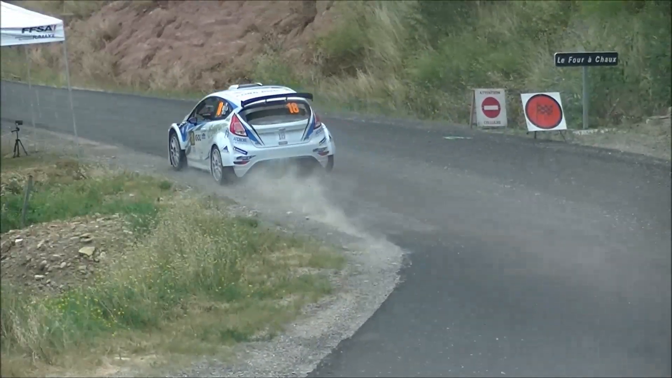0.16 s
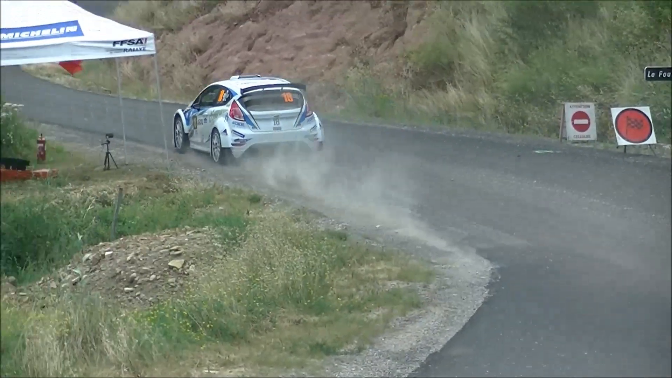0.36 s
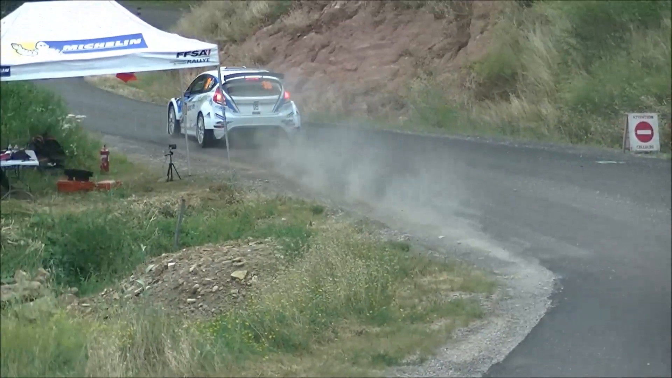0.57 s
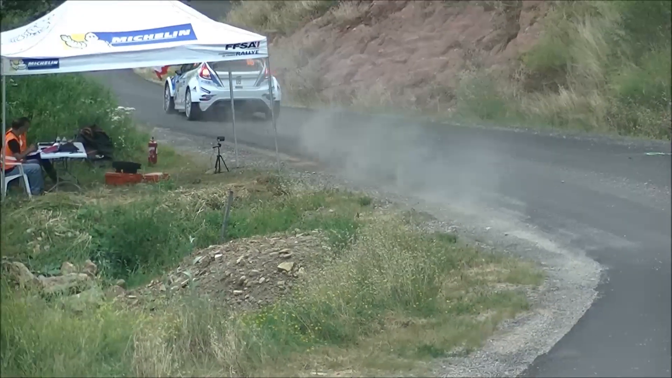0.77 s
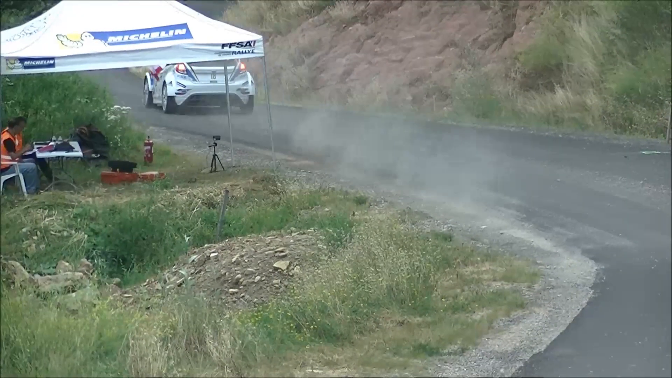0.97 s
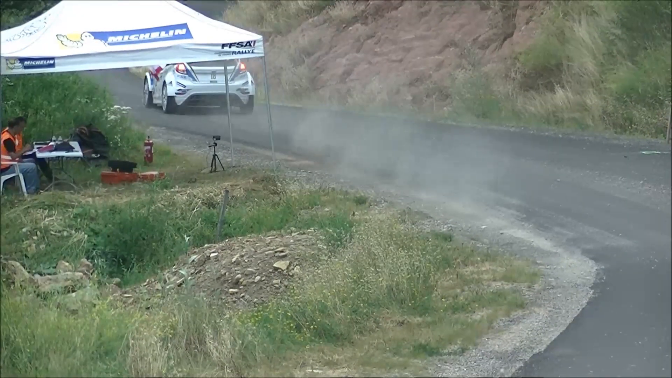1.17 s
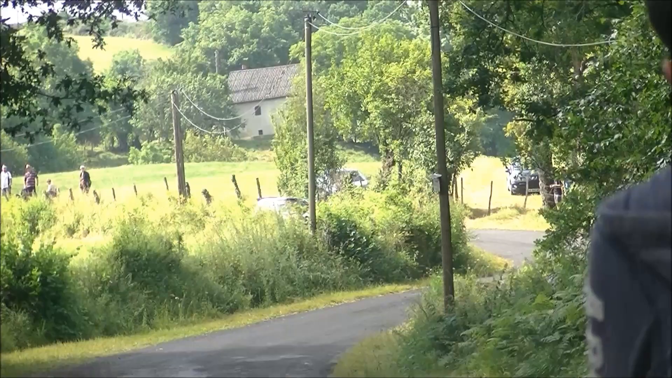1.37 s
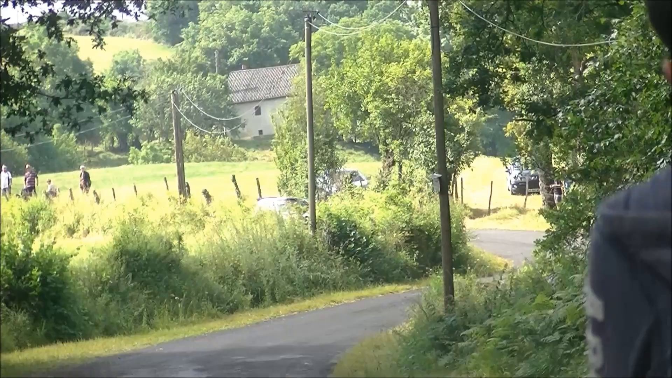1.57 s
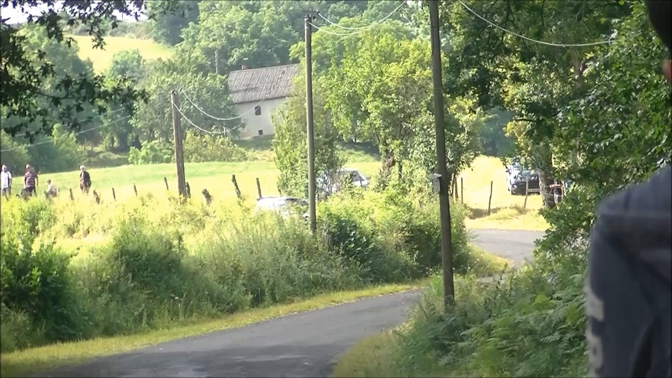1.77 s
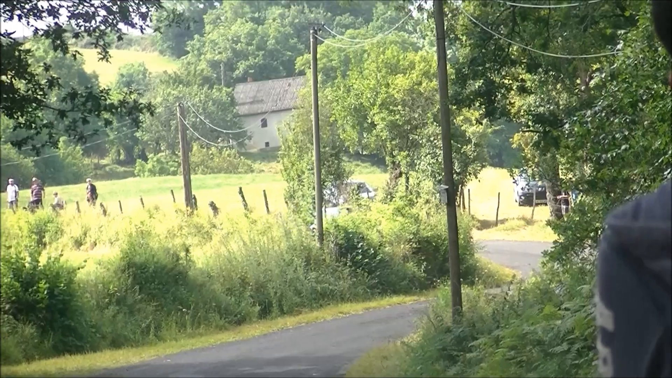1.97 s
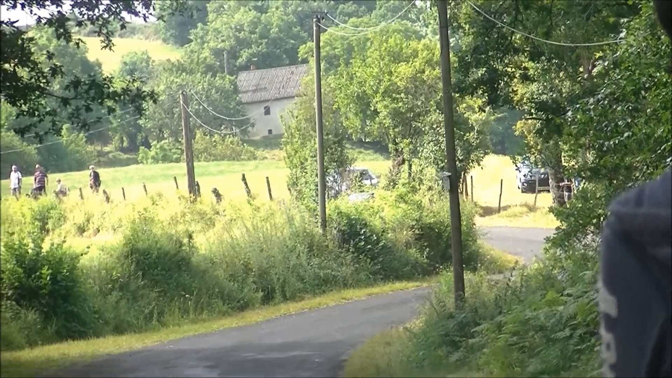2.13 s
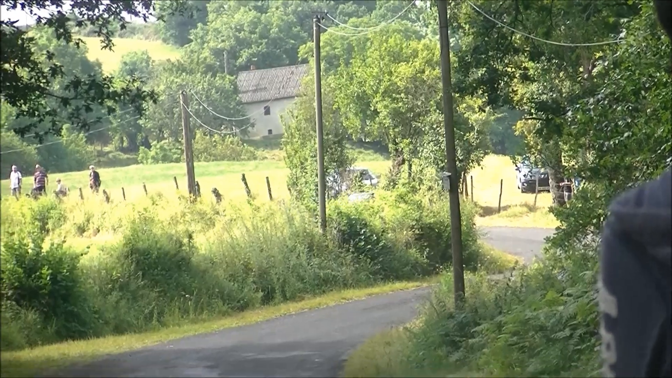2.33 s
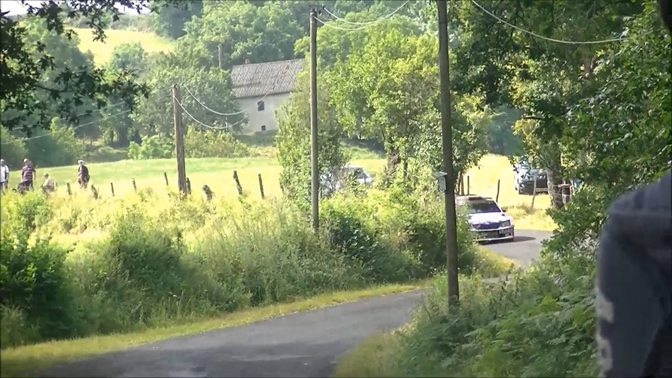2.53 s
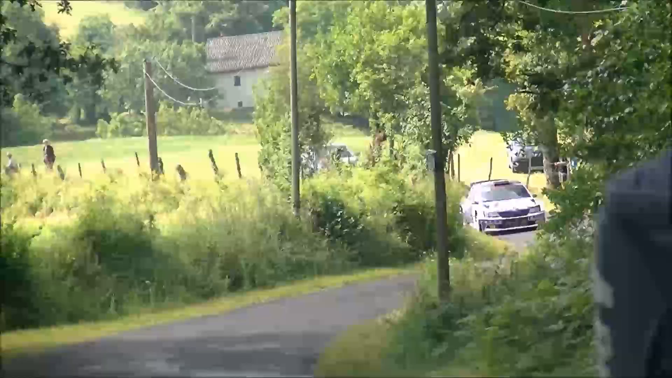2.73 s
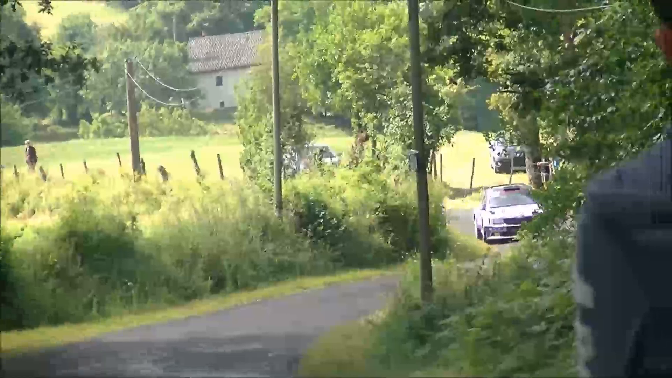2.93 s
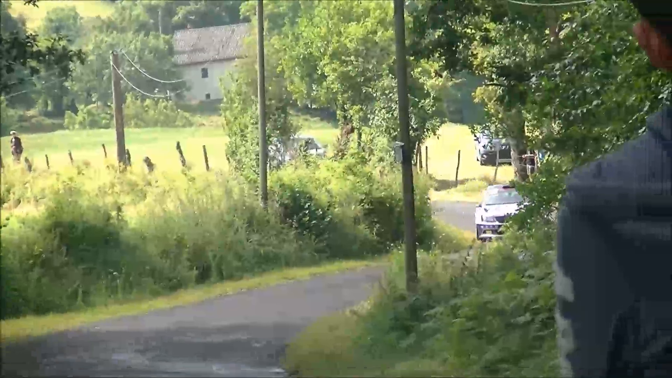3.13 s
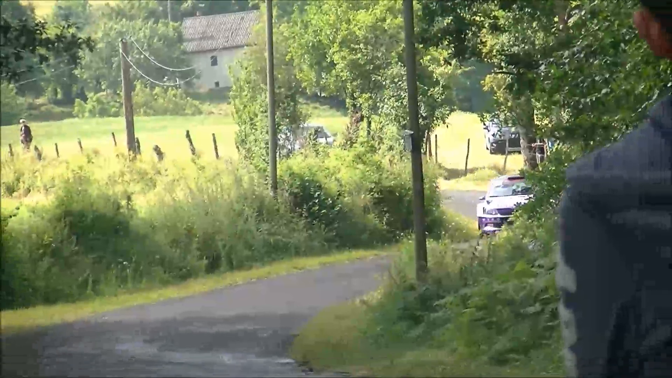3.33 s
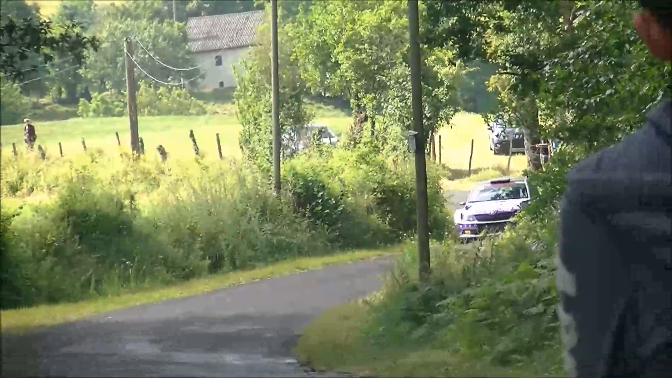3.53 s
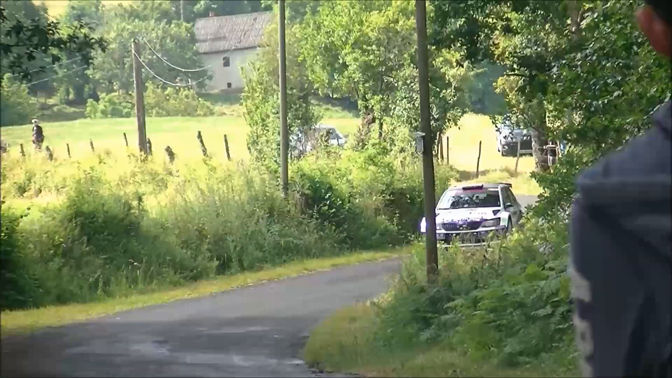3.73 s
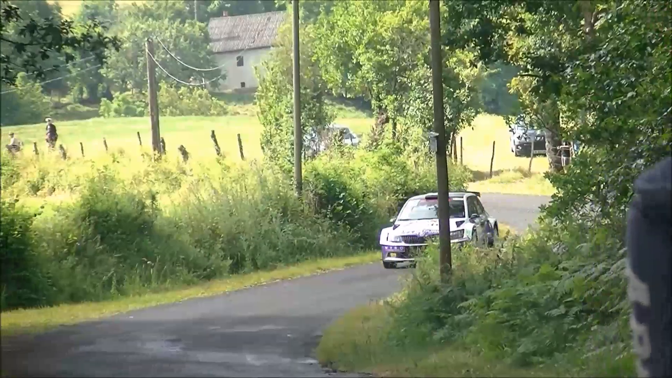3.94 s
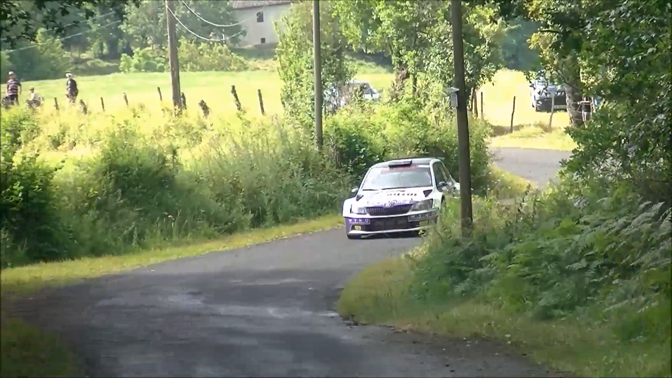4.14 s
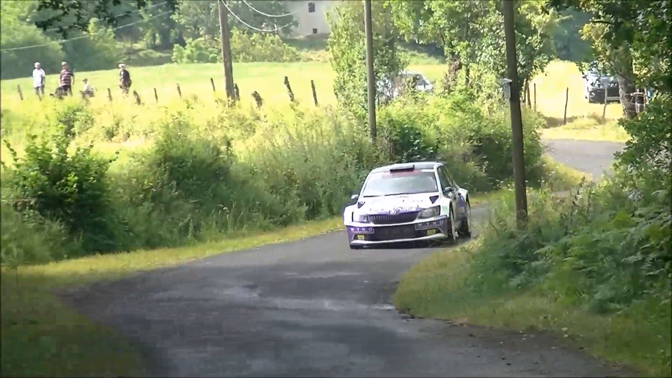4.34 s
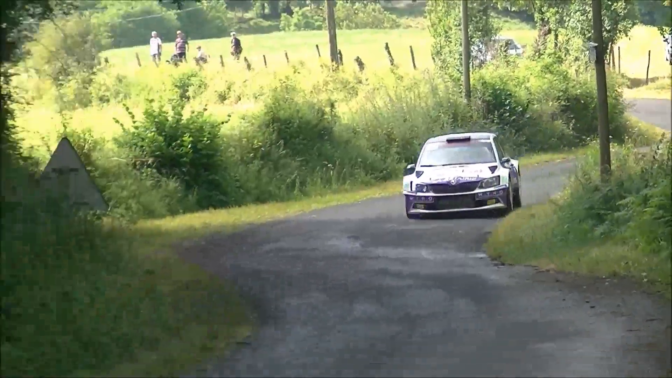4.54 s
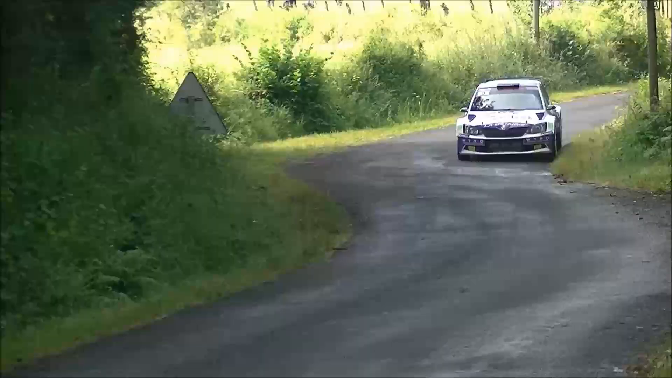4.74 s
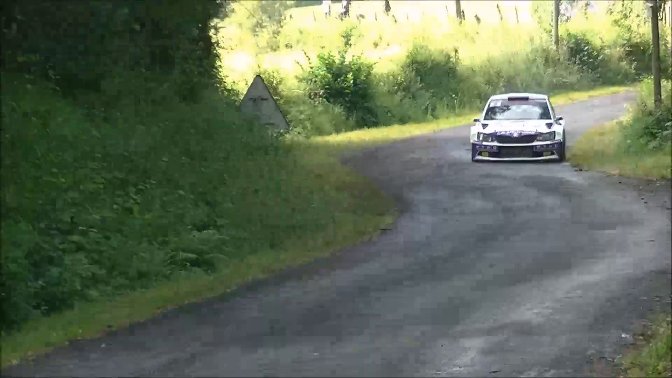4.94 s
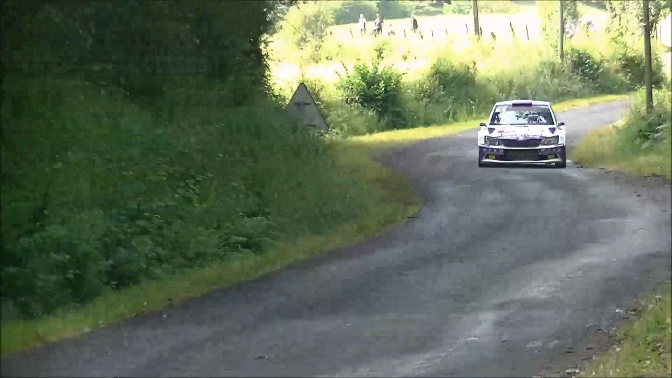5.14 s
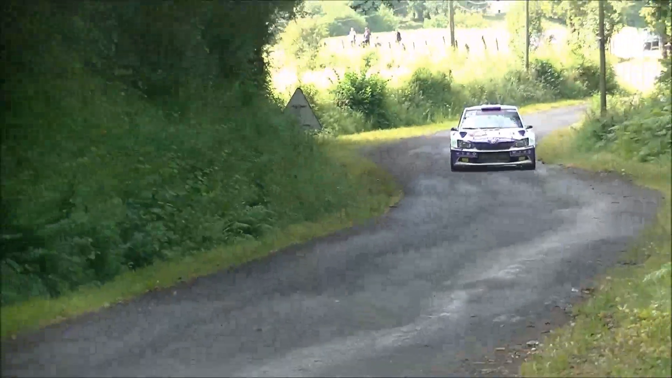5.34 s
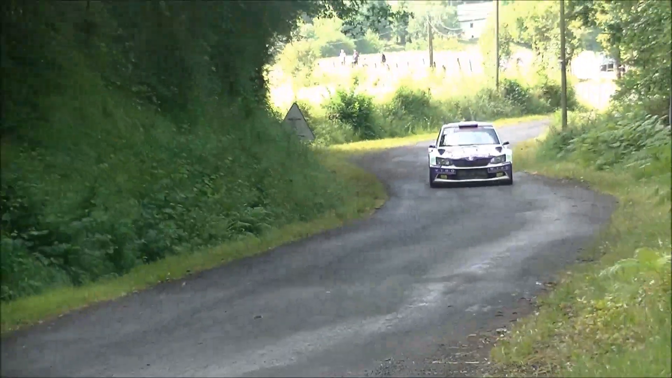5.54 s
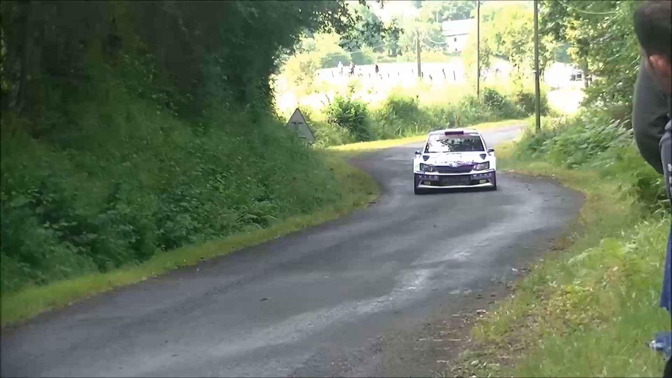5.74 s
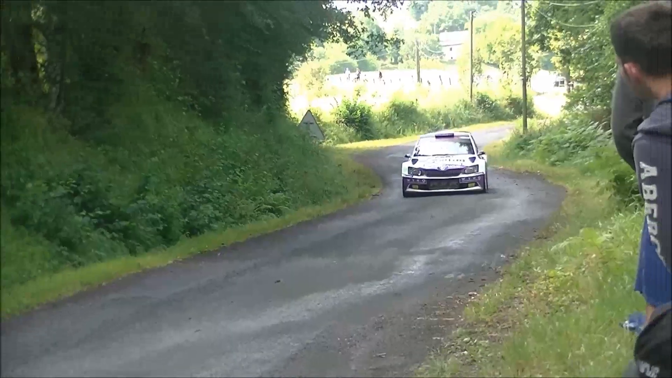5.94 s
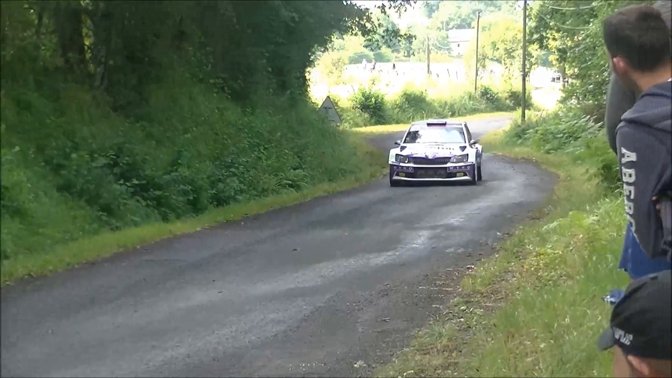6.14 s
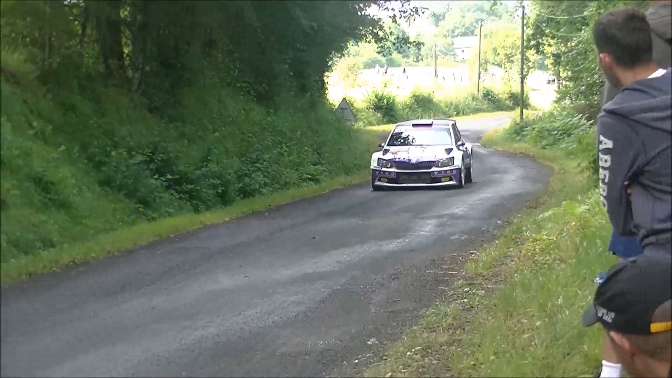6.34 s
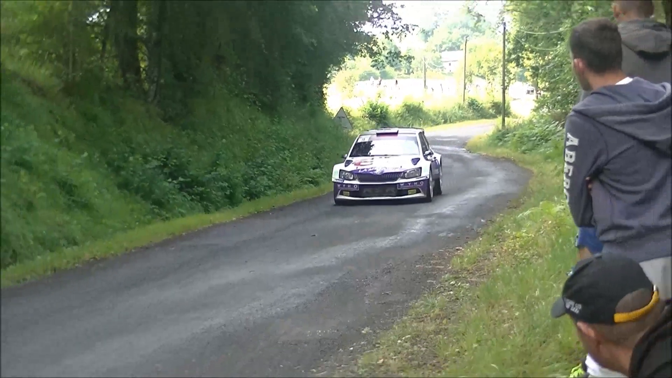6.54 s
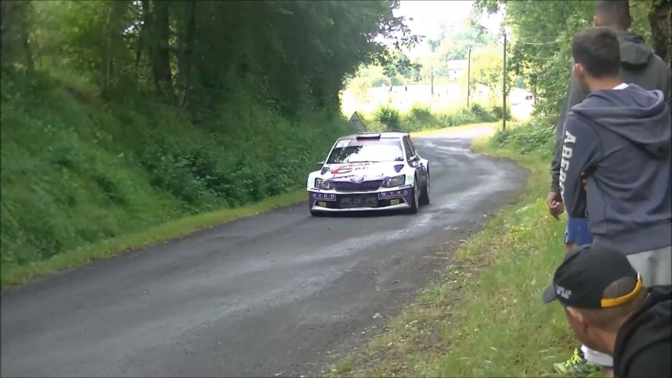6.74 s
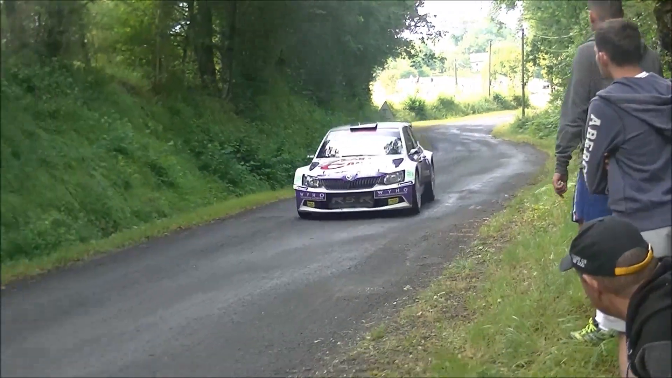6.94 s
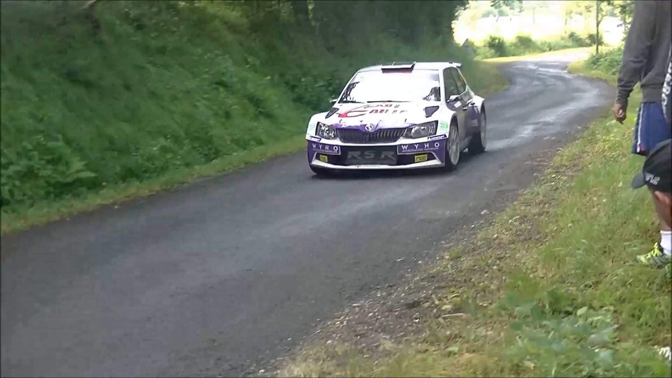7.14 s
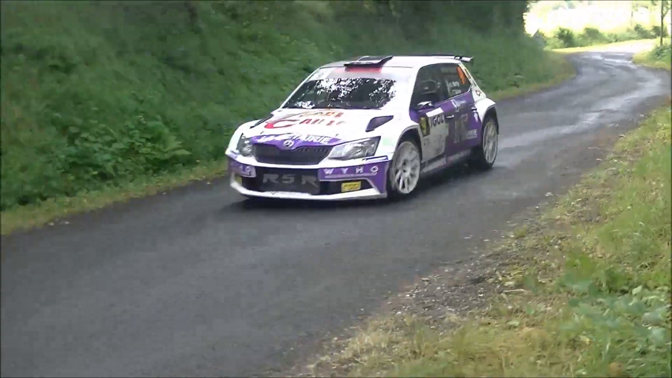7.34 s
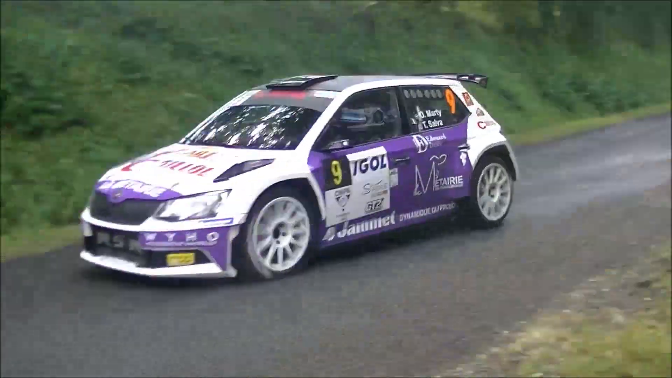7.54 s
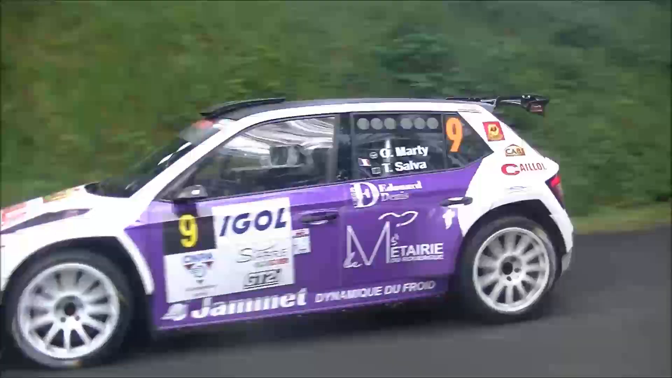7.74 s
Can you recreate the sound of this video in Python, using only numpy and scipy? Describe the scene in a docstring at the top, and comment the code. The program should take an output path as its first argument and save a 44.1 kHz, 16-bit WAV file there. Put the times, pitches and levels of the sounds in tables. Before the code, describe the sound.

A turbocharged rally car roars away and pops on a shift, dead silence, then another approaches with drone, hissing turbo flutter, squeals and cracks.

```python
"""A turbocharged four-cylinder rally car pulls away and shifts with cut ignition; the sound stops dead for a moment.
Then a second car nears down a wooded lane: drone, tyre roar, turbo air, squeals, a few sharp cracks.
Firing pulses ring the exhaust, a sine drones at the firing rate, filtered noise makes air, tyres and woods,
smeared tones squeal and short bursts crack. A small camera with two close microphones hears it."""
import sys
import numpy as np
from scipy import signal
from scipy.fft import rfft, irfft, next_fast_len
from scipy.io import wavfile
from scipy.ndimage import uniform_filter1d

SR = 44100
rng = np.random.default_rng(int(sys.argv[2]) if len(sys.argv) > 2 else 0)


def wav_out(sig):
    """Save sig, one row per channel (or a flat mono array), as 16-bit PCM at SR to the path in sys.argv[1]."""
    wavfile.write(sys.argv[1], SR, np.round(np.clip(np.atleast_2d(sig).T, -1, 1) * 32767).astype(np.int16))


N = 348390
T = np.arange(N) / SR


def undb(db):
    """Gain of a level in dB."""
    return 10 ** (np.asarray(db) / 20)


def unit(x):
    """Scaled to rms 1."""
    return x / np.sqrt(np.mean(x ** 2))


def curves(table):
    """Columns of a time table, one value a sample."""
    s, *columns = np.transpose(table)
    return [np.interp(T, s, c) for c in columns]


def walk(rate_hz, size=N):
    """Random levels, rate_hz a second, slewed twice; spread near 1."""
    k = int(SR / rate_hz)
    steps = np.repeat(rng.standard_normal(size // k + 1), k)
    return 1.25 * uniform_filter1d(uniform_filter1d(steps, k), k)[:size]


def noise(grain_db=0.):
    """Two unrelated noises, for mid and side, made grainy by a quick common flicker."""
    return rng.standard_normal((2, N)) * undb(grain_db * walk(400))


def colour(x, points):
    """Filter by (frequency [Hz], level [dB]) points joined on a log axis."""
    hz, db = np.transpose(points)
    n = next_fast_len(N)
    log_hz = np.log(np.arange(n // 2 + 1) * SR / n + 1)
    gain = undb(np.interp(log_hz, np.log(hz + 1), db))
    return irfft(rfft(x, n) * gain, n)[..., :N]


def ring(x, modes, order=1, patchy_db=0., quick_db=0.):
    """Sum of resonances, each passed `order` times; signs alternate and each may flicker alone."""
    out = 0
    for k, (hz, width_hz, db) in enumerate(modes):
        y = x
        for _ in range(order):
            y = signal.lfilter(*signal.iirpeak(hz, hz / width_hz, SR), y)
        flicker_db = patchy_db * walk(14) + quick_db * walk(60) if patchy_db else 0
        out = out + (-1) ** k * undb(db + flicker_db) * y
    return out


def firings(hz, cut, jitter_periods, scatter_db, weak_db):
    """A pulse a firing; with the ignition cut only one in four fires fully, and less evenly."""
    turns = np.cumsum(hz) / SR  # firings so far
    k = np.arange(1, int(turns[-1]))
    late, loud = rng.standard_normal((4000, 2))[k].T
    at = np.interp(k, turns, np.arange(N))
    i = at.astype(int)
    c = cut[i]
    at = np.clip(at + jitter_periods * (1 + 29.0 * c) * late * SR / hz[i], 0, N - 2)
    size = undb(scatter_db * (1 + c) * loud + weak_db * c * (k % 4 > 0))
    pulses, i = np.zeros(N), at.astype(int)
    # each pulse is split between two samples to keep its exact time
    np.add.at(pulses, i, size * (1 - at + i))
    np.add.at(pulses, i + 1, size * (at - i))
    return pulses, turns


def wide(x):
    """Mid, and a side a quarter wave apart: the microphones differ in phase, not level."""
    return np.array([x, signal.hilbert(x).imag])


# leaving car: (time [s], firing rate [Hz], exhaust before cut boost [dB], ignition cut [0-1], roar [dB])
LEAVING_DRIVE = [(0, 160.2, -18, 0, -23), (.2, 166.9, -19.5, 0, -24.5), (.40, 169.5, -21, 0.01, -22),
                 (.445, 168.6, -16, 0.26, -23.5), (.47, 208.3, -22.5, 0.93, -21),
                 (.66, 181.2, -24, 0.82, -25), (.89, 169.7, -24, 0.56, -26.5)]
# exhaust pipe resonances: (frequency [Hz], width [Hz], level [dB])
PIPE_MODES = [(174, 120, 6), (310, 82, 8), (528, 40, 7.5), (680, 153, 2), (870, 370, -9),
              (1630, 400, -16.5)]
# gas roar spectrum: (frequency [Hz], density [dB per Hz])
LEAVING_ROAR_SPECTRUM = [(40, -30.5), (130, -16), (530, 0.5), (900, -1), (1250, -14.5), (1990, -9),
                         (2450, -12), (5750, -23.5), (12700, -52.5), (16000, -86)]
CUT_BOOST_DB = 5.0  # exhaust gain at full cut


def leaving_car():
    """Exhaust blows ring the pipe; gas roars steadily and a little harder with each firing."""
    hz, pipe_db, cut, roar_db = curves(LEAVING_DRIVE)
    pulses, turns = firings(hz, cut, jitter_periods=.005, scatter_db=1.0, weak_db=-16)
    pipe_band = signal.butter(4, [125, 2600], "band", fs=SR, output="sos")
    pipe = signal.sosfilt(pipe_band, ring(pulses, PIPE_MODES, patchy_db=0.5))
    pipe = unit(pipe) * undb(pipe_db + CUT_BOOST_DB * cut)
    gas = noise(1.7) * (6.5 + np.exp(-(turns % 1) / 0.16))
    roar = unit(colour(gas, LEAVING_ROAR_SPECTRUM)) * undb(roar_db)
    return wide(pipe) + roar


# coming car, engine: (time [s], firing rate [Hz], drone [dB])
COMING_ENGINE = [(1.8, 205.7, -55), (2.14, 210.4, -48.5), (2.24, 204.2, -43), (3.85, 226.6, -33),
                 (3.92, 187, -40), (4.95, 184, -36.5), (5.03, 167.5, -36.5), (5.59, 165.6, -37),
                 (5.67, 221.4, -24), (5.72, 183.2, -38), (5.84, 219.5, -24), (5.88, 189.4, -29),
                 (5.96, 210, -27), (6.0, 191.8, -26.5), (6.27, 192, -24), (6.44, 168, -30),
                 (6.49, 175, -24), (6.86, 153.9, -33), (7.22, 149, -26), (7.6, 146.9, -25),
                 (7.75, 143.4, -29), (7.9, 145.1, -35)]
# tailpipe resonances: (frequency [Hz], width per pass [Hz], level [dB])
TAILPIPE_MODES = [(274.4, 50, 6.5), (439, 140, 0.5), (575, 83, 4.5), (719, 100, -0.5), (874, 104, 1)]
# coming car, round the bends: (time [s], distance [m])
APPROACH_PATH = [(1.8, 120), (2.3, 132), (3.2, 75), (4.2, 36.7), (5.0, 15.6), (6.2, 13.6), (6.5, 8),
                 (6.8, 10.3), (7.2, 6.9), (7.9, 4.5)]
TAIL_HIDDEN_1M_DB, TAIL_OPEN_1M_DB = -20, -5.5  # the body hides the tailpipe until the car draws level
TAIL_TURNS_S, TAIL_TURN_S = 7.584, 0.11  # midpoint, time constant
GROWL_HZ, GROWL_WIDTH_HZ, GROWL_DB = 600, 600, -8  # gas rasp, relative to the ringing


def coming_engine():
    """From the front mainly the firing tone carries; overtones open up as the tailpipe turns this way."""
    hz, drone_db = curves(COMING_ENGINE)
    metres, = curves(APPROACH_PATH)
    pulses, turns = firings(hz, 0 * hz, jitter_periods=.007, scatter_db=1.8, weak_db=0)
    drone = np.sqrt(2) * np.sin(2 * np.pi * turns) * undb(drone_db + 2.1 * walk(25))
    hidden = 1 / (1 + np.exp((T - TAIL_TURNS_S) / TAIL_TURN_S))
    tail_db = TAIL_OPEN_1M_DB + (TAIL_HIDDEN_1M_DB - TAIL_OPEN_1M_DB) * hidden
    gas = rng.standard_normal(N) * np.exp(-(turns % 1) / 0.34)
    growl = unit(ring(gas, [(GROWL_HZ, GROWL_WIDTH_HZ, 0)])) * undb(GROWL_DB)
    ringing = unit(ring(pulses, TAILPIPE_MODES, order=2, patchy_db=2.5))
    overtones = (ringing + growl) * undb(tail_db + walk(9.2)) / metres
    return wide(drone - overtones)


# compressor surge, one row a puff: (crest time [s], crest gain before shares [dB])
SURGE_PUFFS = [(4.311, 10.5), (4.367, 13), (4.447, 9), (4.517, 8), (4.585, 7), (4.652, 4), (5.119, 11.5),
               (5.589, 11), (5.675, 9.5), (5.74, 9), (5.823, 8.5), (5.882, 6), (5.965, 5.5), (6.03, 9),
               (6.166, 7.5), (6.23, 6.5), (6.298, 9)]
PUFF_RISE_S, PUFF_FALL_S = 0.006, 0.015
STALL_DB, STALL_LEADS_S, STALL_S = -5.5, 0.032, 0.0077  # the flow chokes just before each puff


def surge():
    """Gain on the turbo air: the flow stalls, then slips back through the compressor in a puff."""
    db = np.zeros(N)
    for s, crest_db in SURGE_PUFFS:
        near = slice(int((s - .1) * SR), int((s + .1) * SR))
        u = T[near] - s
        puff = np.exp(-np.where(u < 0, (u / PUFF_RISE_S) ** 2, u / PUFF_FALL_S))
        stall = np.exp(-((u + STALL_LEADS_S) / STALL_S) ** 2)
        db[near] += crest_db * puff + STALL_DB * stall
    return undb(db)


GRAIN_LOW_HZ, GRAIN_HIGH_HZ, GRAIN_S, GRAIN_SCATTER_DB = 2050, 7000, .05, 1.4


def tone_grains(count=1500):
    """Short random tone grains, 2 to 7 kHz, that make the hiss streaky; some louder than the rest."""
    u = np.arange(int(GRAIN_S * SR))
    at, pitch, size = rng.random((count, 3)).T
    hz = np.interp(pitch, [0, 1], [GRAIN_LOW_HZ, GRAIN_HIGH_HZ])
    gain = undb(-GRAIN_SCATTER_DB * np.log(size + 1e-9))[:, None]
    tones = np.sin(2 * np.pi * np.outer(hz, u) / SR) * np.hanning(len(u)) * gain
    places = (at * (N - len(u))).astype(int)[:, None] + u
    return unit(np.bincount(places.ravel(), tones.ravel(), N))


# turbo air: (time [s], intake hiss [dB])
INTAKE_HISS = [(1.8, -41), (2.27, -50), (2.77, -47.5), (2.8, -36.5), (2.99, -38.5), (3.31, -33.5),
               (3.58, -42.5), (4.16, -41), (4.26, -25.5), (4.98, -22.5), (5.44, -20.5), (6.28, -22.5),
               (6.35, -31), (6.5, -24), (6.64, -20), (6.85, -28), (6.95, -21.5), (7.34, -19.5), (7.83, -41),
               (7.9, -52)]
# intake resonances: (frequency [Hz], width per pass [Hz], level [dB])
INTAKE_MODES = [(2126, 69, -1.5), (2550, 1010, 4.5), (4170, 2170, -2.5)]
GRAINS_DB = -10.5  # relative to the noise that feeds the intake
INTAKE_SURGE_SHARE = 0.6  # exponent on the surge gain
PUFF_HZ, PUFF_WIDTH_HZ, PUFF_DB = 2517, 380, 1.5  # level relative to the hiss


def intake_air(puffs):
    """Rushing air rings the intake; each puff rings its low resonance hardest."""
    hiss_db, = curves(INTAKE_HISS)
    rush = noise(0.58) + tone_grains() * undb(GRAINS_DB)
    intake = unit(ring(rush, INTAKE_MODES, order=2, patchy_db=1.3, quick_db=1.37))
    intake = intake * undb(hiss_db + 0.5 * walk(30))
    chuff = unit(ring(noise(2.4), [(PUFF_HZ, PUFF_WIDTH_HZ, 0)], order=2))
    chuff = chuff * undb(hiss_db + PUFF_DB) * np.clip(puffs - 1, 0, None)
    return intake * puffs ** INTAKE_SURGE_SHARE + chuff


# the valve vents: (opens [s], starts to shut [s], hiss [dB])
VALVE_VENTS = [(2.766, 2.886, -46), (2.977, 3.49, -47), (4.34, 4.556, -24), (5.093, 5.125, -26.5),
               (6.52, 6.896, -22.5), (6.96, 7.408, -27.5)]
VENT_RISE_S, VENT_FALL_S = 0.03, 0.15


def vents():
    """Gain of the open valve: quick rise, hold, dying fall."""
    gain = 0
    for t0, t1, db in VALVE_VENTS:
        rise = np.clip((T - t0) / VENT_RISE_S, 0, 1)
        fall = np.exp(-np.clip(T - t1, 0, None) / VENT_FALL_S)
        gain = gain + undb(db) * rise * fall
    return gain


# valve resonances: (frequency [Hz], width per pass [Hz], level [dB])
VALVE_MODES = [(5180, 1080, 2.5), (6484, 690, 5), (7890, 1670, -8), (12200, 3440, -12.5)]
VALVE_SHUT_DB = -10.5  # leak relative to the intake
VALVE_SURGE_SHARE = 0.4  # exponent on the surge gain


def valve_air(puffs):
    """Air hisses through the valve, leaking when shut and loud when it vents."""
    hiss_db, = curves(INTAKE_HISS)
    gain = np.hypot(undb(hiss_db + VALVE_SHUT_DB), vents())
    hiss = unit(ring(noise(2.1), VALVE_MODES, order=2, patchy_db=3.5, quick_db=2.3))
    return hiss * gain * undb(0.26 * walk(30)) * puffs ** VALVE_SURGE_SHARE


# tyre roar spectrum: (frequency [Hz], density [dB per Hz])
TYRE_SPECTRUM = [(18, -69), (30, -44.5), (127, -11.5), (252, -7.5), (580, -5), (850, -9.5), (1130, -4.5),
                 (1390, -8), (1650, -5.5), (2480, -6.5), (6550, -19), (12300, -32), (16000, -42)]
TYRES_1M_DB = -5


def tyre_roar():
    """Grainy noise, its level falling inversely with distance."""
    metres, = curves(APPROACH_PATH)
    return unit(colour(noise(1.8), TYRE_SPECTRUM)) * undb(TYRES_1M_DB + 1.74 * walk(12)) / metres


# narrow squeals and whistles: (start [s], end [s], start [Hz], end [Hz], width [Hz], level [dB])
SQUEAL_GLIDES = [(0.671, 0.883, 2027, 2010, 69.8, -32.5), (2.501, 2.8, 1665, 1700, 60, -50.5),
                 (2.786, 2.893, 2230, 2170, 70, -33), (2.899, 2.957, 2290, 2140, 80, -35.5),
                 (2.958, 3.238, 2050, 2150, 75, -41.5), (3.2, 3.252, 2630, 2510, 80, -47),
                 (3.191, 3.34, 2950, 2940, 90, -49), (3.25, 3.347, 2140, 2210, 70, -36),
                 (4.202, 4.304, 2190, 2200, 98.9, -28.5), (5.42, 5.65, 2147, 2250, 169.6, -21),
                 (6.53, 6.97, 2364, 2340, 300, -28.5), (6.537, 6.587, 2438, 2263, 200, -22),
                 (6.593, 6.654, 2330, 2436, 200, -22), (6.68, 6.736, 2356, 2464, 171, -20),
                 (6.789, 6.842, 2380, 2310, 200, -20.5), (6.887, 6.942, 2365, 2340, 150, -20.5),
                 (6.528, 6.916, 6490, 6630, 500, -22), (6.78, 6.941, 5130, 5270, 300, -24.5),
                 (6.90, 7.848, 1102, 1385, 163, -27.5), (7.15, 7.455, 2475, 2480, 200, -29.5),
                 (7.30, 7.783, 4875, 4720, 700, -24.5), (6.93, 7.403, 10400, 10430, 600, -38)]
SQUEAL_STUTTER_DB = 2.6  # for a wholly ragged squeal
SQUEAL_CLEAN_HZ = 130  # narrower squeals keep a steady core, wider ones break up


def squeals(edge_s=0.0099):
    """Each a gliding tone smeared into a narrow band that wavers and stutters."""
    out = np.zeros((2, N))
    for t0, t1, hz0, hz1, width_hz, db in SQUEAL_GLIDES:
        i, j = int(t0 * SR), int(t1 * SR)
        u = T[:j - i]
        shape = (2, len(u) + SR // 10)  # extra run-in for the filter
        smear = rng.standard_normal(shape) + 1j * rng.standard_normal(shape)
        smear = signal.lfilter(*signal.butter(2, width_hz / 2, fs=SR), smear)[:, -len(u):]
        ragged = min(width_hz / SQUEAL_CLEAN_HZ, 1)
        smear = ragged * smear / np.std(smear) + 2 * (1 - ragged)
        hz = np.linspace(hz0, hz1, len(u)) * (1 + .007 * walk(30, size=len(u)))
        tone = (smear * np.exp(2j * np.pi * np.cumsum(hz) / SR)).real
        stutter = undb(ragged * SQUEAL_STUTTER_DB * walk(55, size=len(u)))
        edges = np.clip(np.minimum(u, u[-1] - u) / edge_s, 0, 1)
        out[:, i:j] += unit(tone * stutter) * undb(db) * edges
    return out


# sharp cracks: (time [s], mid peak [dB], tick centre [Hz])
CRACK_SNAPS = [(2.7381, -7.5, 7400), (4.274, -5, 5900), (6.091, -5, 4500)]


def cracks():
    """Dry snaps: a bright tick and a duller ring a few milliseconds long."""
    out = np.zeros((2, N))
    u = np.arange(600) / SR
    for s, db, hz in CRACK_SNAPS:
        burst = rng.standard_normal((2, len(u)))
        tick = ring(burst * np.exp(-u / 0.00063), [(hz, 0.18 * hz, 0)])
        dull = ring(burst * np.exp(-u / 0.0013), [(.5 * hz, 0.36 * hz, -2)])
        snap = tick + dull
        i = int(s * SR)
        out[:, i:i + len(u)] += snap / np.abs(snap[0]).max() * undb(db)
    return out


AIR_LOSS_HZ, AIR_LOSS_DB_PER_M = 8400, 0.44


def through_air(x):
    """Distance dulls the top."""
    metres, = curves(APPROACH_PATH)
    top = signal.sosfilt(signal.butter(2, AIR_LOSS_HZ, "high", fs=SR, output="sos"), x)
    low = signal.sosfilt(signal.butter(2, AIR_LOSS_HZ, fs=SR, output="sos"), x)
    return low - top * undb(-AIR_LOSS_DB_PER_M * metres)  # minus: the halves cross over in antiphase


# woods rumble spectrum: (frequency [Hz], density [dB per Hz])
WOODS_SPECTRUM = [(25, -21), (141, -14.5), (204, 1), (300, -8), (520, -15), (880, -120)]
WOODS_DB, CAMERA_HISS_DB = -50, -67.5


def background():
    """The woods rumble faintly, as low filtered noise, over the camera's white hiss."""
    return unit(colour(noise(), WOODS_SPECTRUM)) * undb(WOODS_DB) + noise() * undb(CAMERA_HISS_DB)


# stereo width: (frequency [Hz], side filter gain [dB])
SIDE_GAIN = [(60, -9), (200, -20), (380, -21), (700, -29), (1290, -56), (2380, -14), (4400, -7.5),
             (15000, -1)]
SILENCE_START_S, SILENCE_END_S = .892, 1.795
LEFT_DB, RIGHT_DB = -1.31, -0.8
MIC_LAG_SAMPLES = 7


def scene():
    """Both cars with the silence between; the microphones differ most in the treble, partly by a short lag."""
    puffs = surge()
    moving_air = through_air(tyre_roar() + intake_air(puffs) + valve_air(puffs))
    coming = coming_engine() + moving_air + background() + cracks()
    before, after = T < SILENCE_START_S, T > SILENCE_END_S
    mid, side = leaving_car() * before + coming * after + squeals()
    treble_band = signal.butter(2, [1500, 9500], "band", fs=SR)
    lagged = signal.lfilter(*treble_band, np.roll(mid, MIC_LAG_SAMPLES))
    side = colour(0.78 * side + 0.5 * lagged, SIDE_GAIN) * (before | after)
    return np.array([undb(LEFT_DB) * (mid + side), undb(RIGHT_DB) * (mid - side)])


TOP_HZ = 15900


def record(dry):
    """The camera cuts the top with a steep low-pass."""
    return signal.sosfilt(signal.ellip(10, .2, 80, TOP_HZ, fs=SR, output="sos"), dry)


dry = scene()
out = record(dry)
wav_out(out)
```